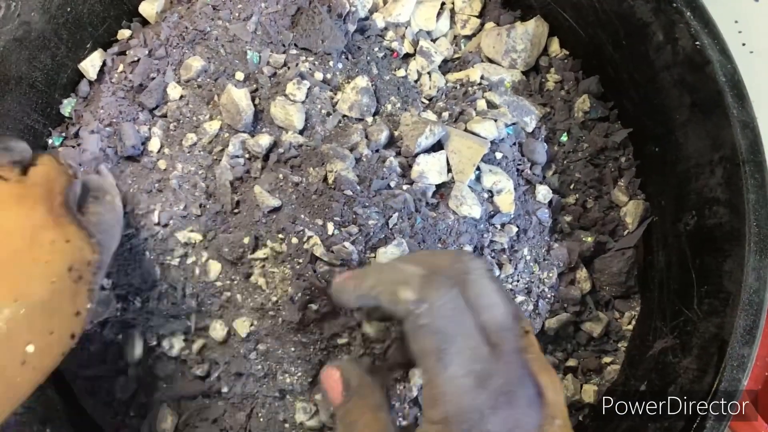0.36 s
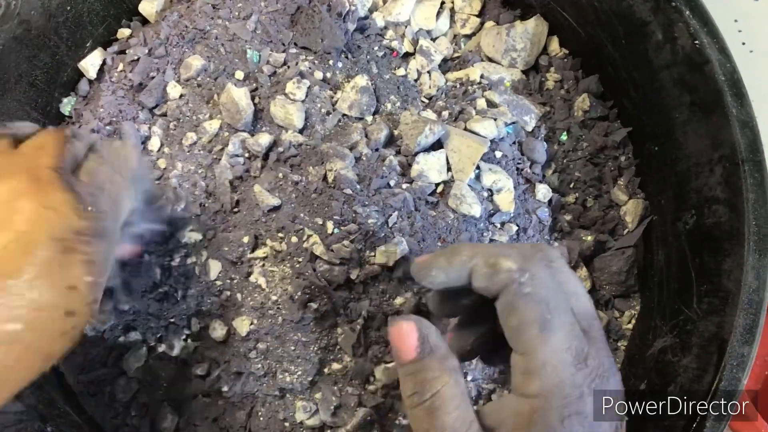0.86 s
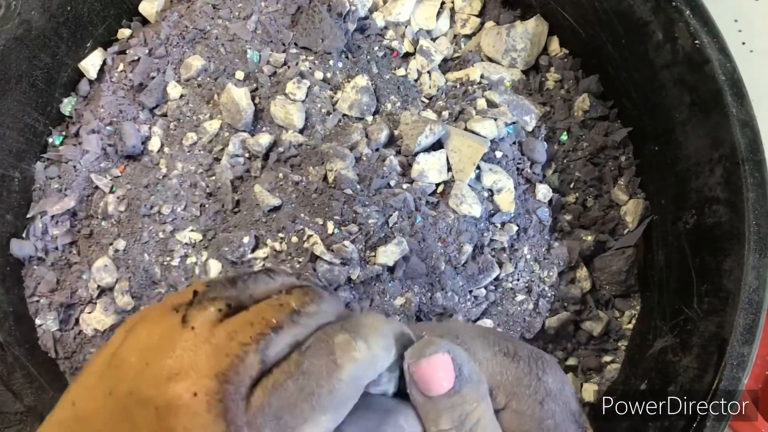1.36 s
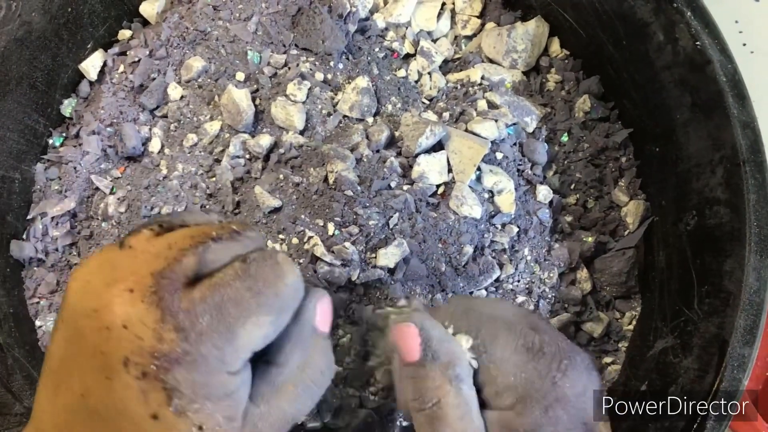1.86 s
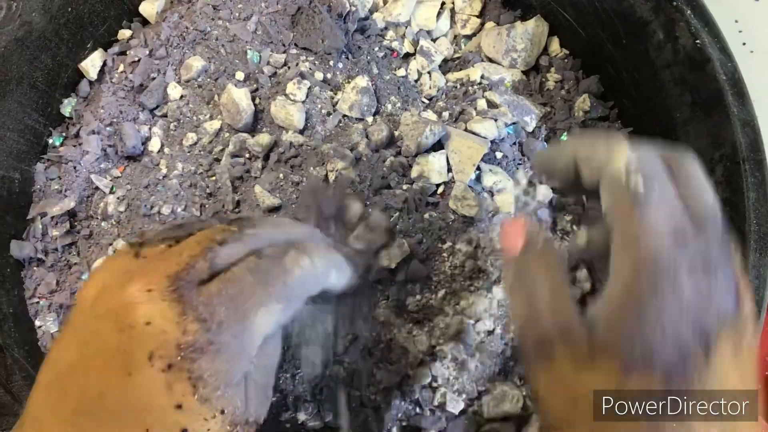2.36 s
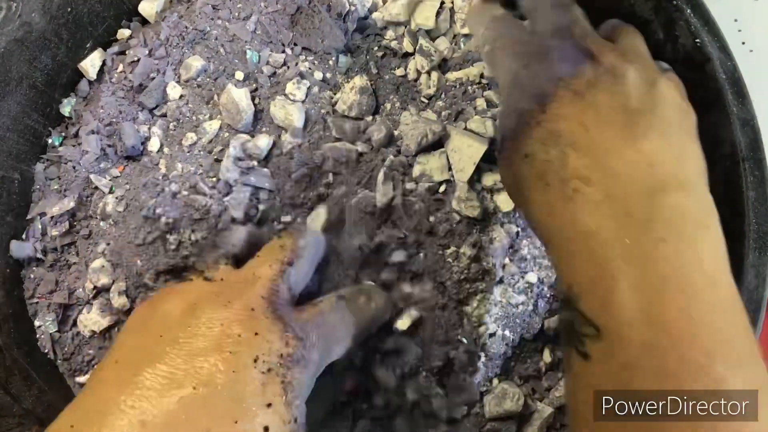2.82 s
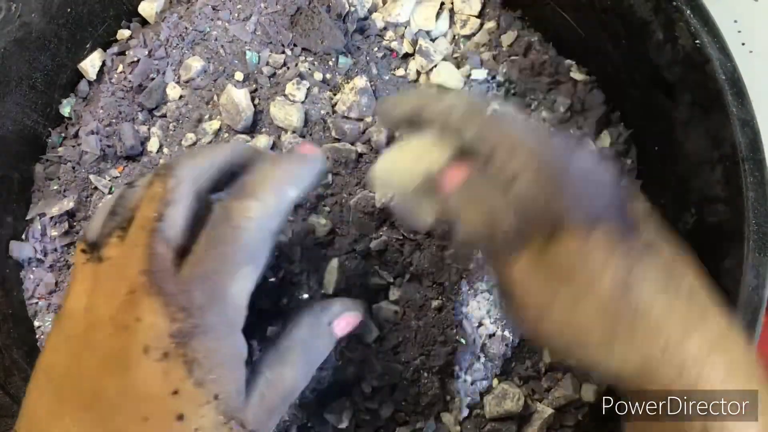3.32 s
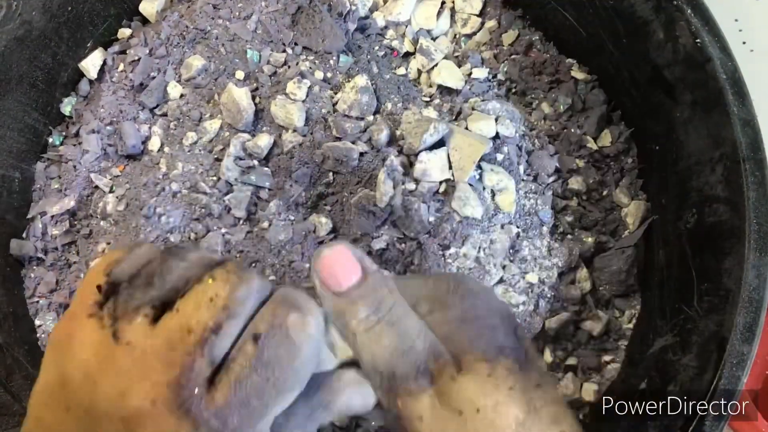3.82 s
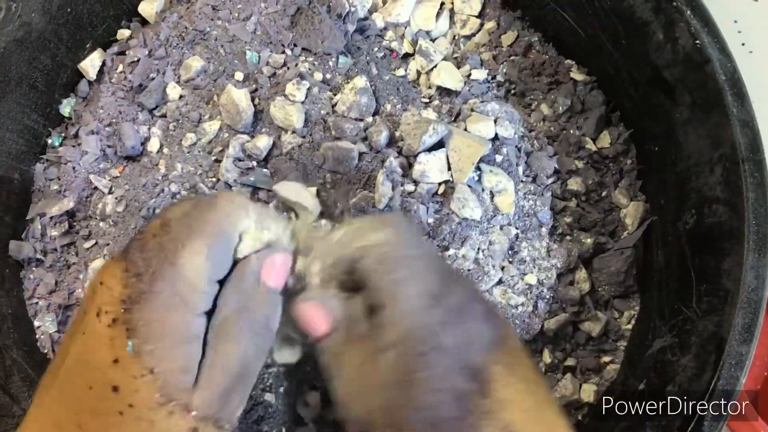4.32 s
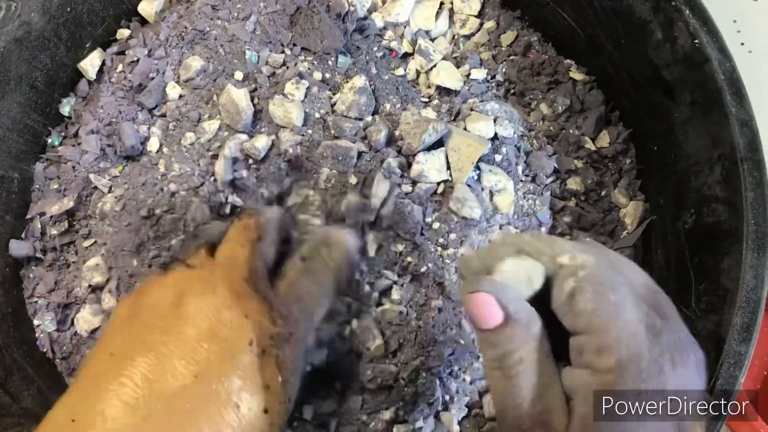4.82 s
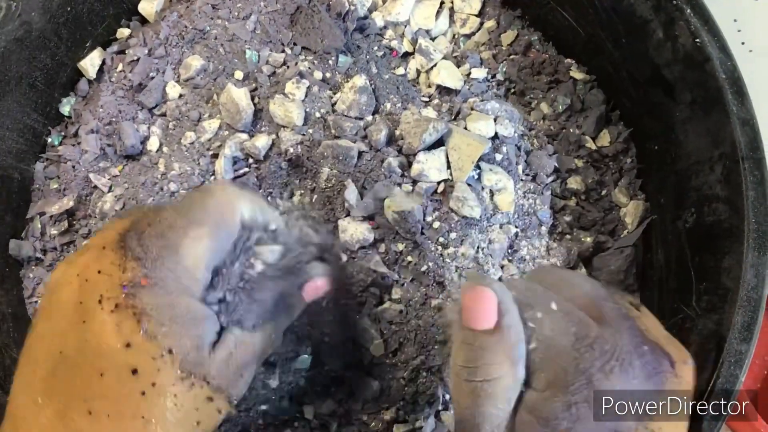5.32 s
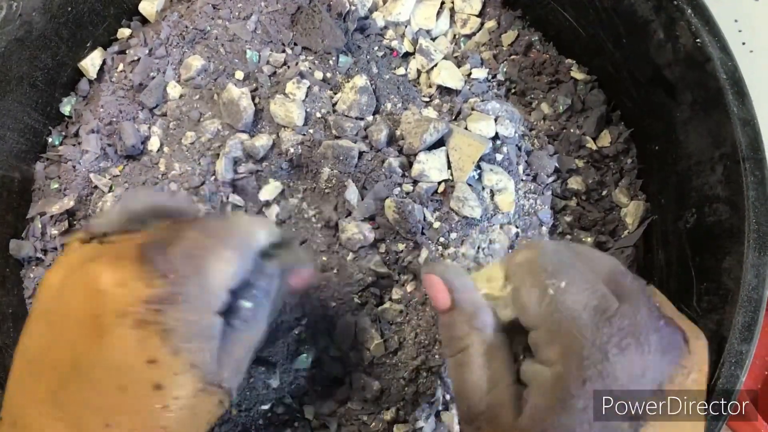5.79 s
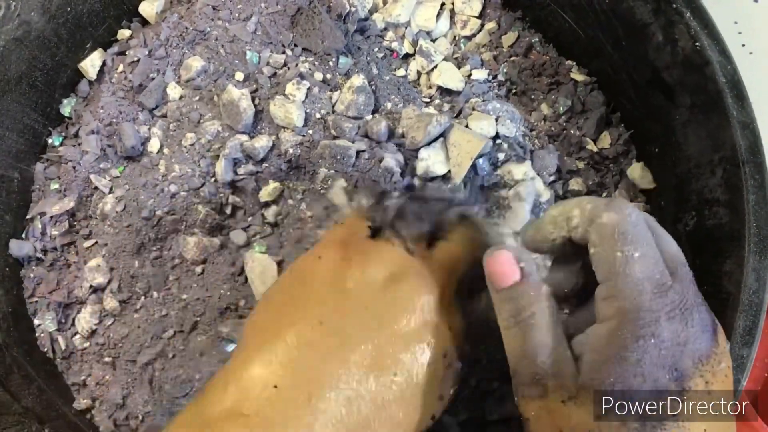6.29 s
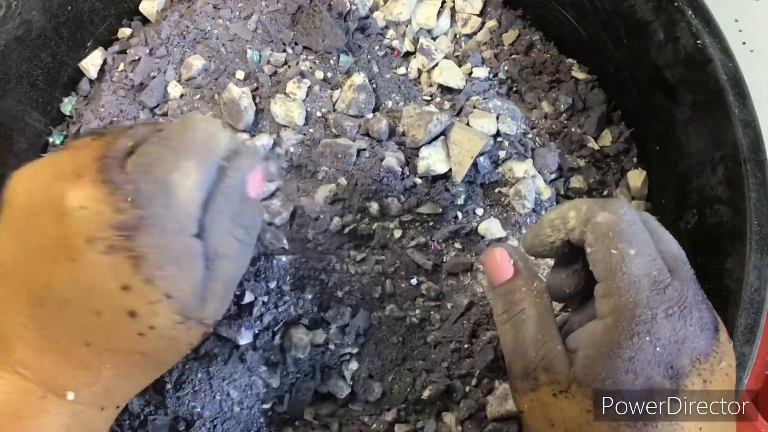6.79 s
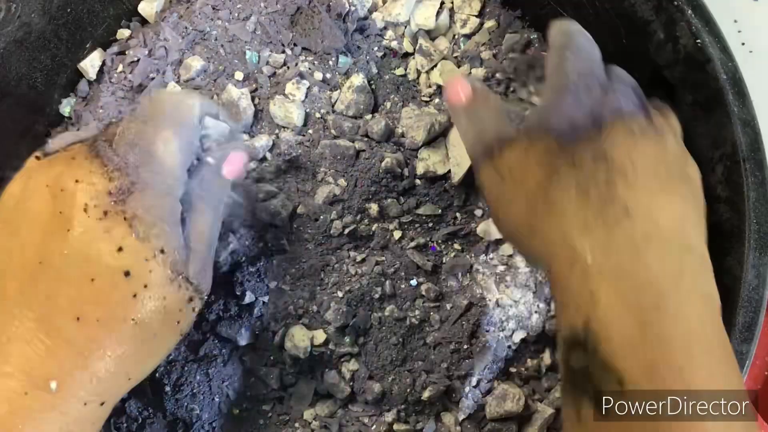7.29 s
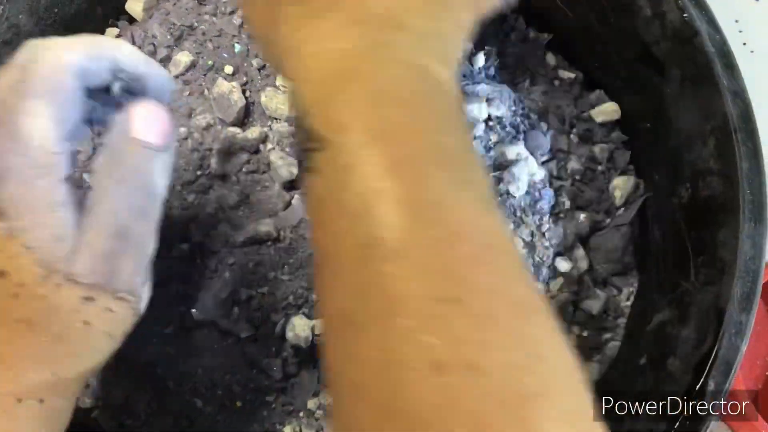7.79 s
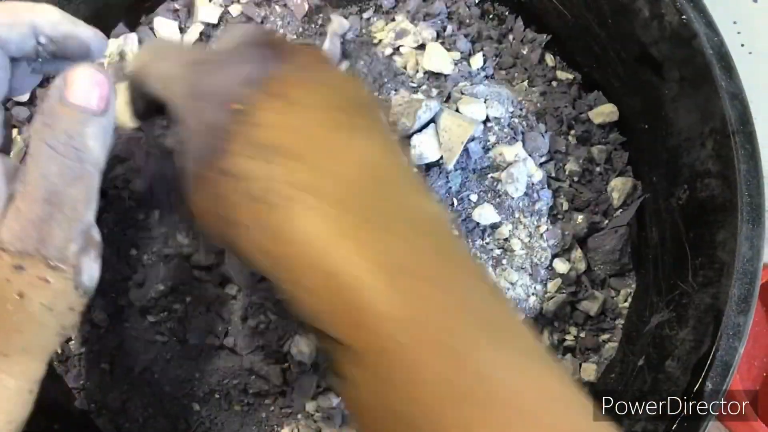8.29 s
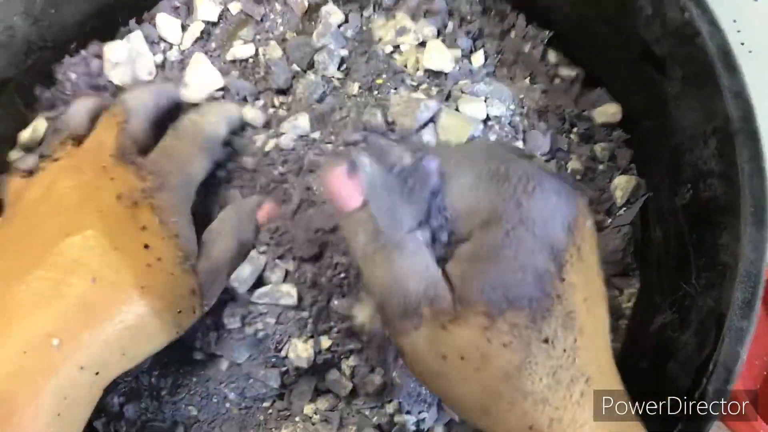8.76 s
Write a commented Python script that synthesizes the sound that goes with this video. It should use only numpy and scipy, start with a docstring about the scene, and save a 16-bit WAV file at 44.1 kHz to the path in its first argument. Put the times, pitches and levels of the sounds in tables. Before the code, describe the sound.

Fingers crumble dry chalk lumps to powder in a wide plastic tub, sandy crackle, sharp snaps, soft low booms, ending in heavy scooping and a loud thud.

```python
"""Fingers rub chalk to powder with a dry, sandy crackle, close under a phone microphone; a wide plastic
tub booms when its floor is pushed or knocked. Tiny fractures ringing grains over hiss make the crackle,
short bursts of tearing noise ring the snapping lumps, and tuned resonances make the tub.
Dragged lumps knock its wall, grit rattles in the hollow of a scooping hand, a quiet room hums below,
and the loudest blows overload the input."""
import sys
import numpy as np
from scipy import signal
from scipy.fft import rfft, irfft
from scipy.io import wavfile

SR = 44100
rng = np.random.default_rng(int(sys.argv[2]) if len(sys.argv) > 2 else 0)


def ratio_of_db(decibels):
    """Turn decibels (scalar or array-like) into linear amplitude factors; 0 dB maps to 1."""
    return 10 ** (np.asarray(decibels, float) / 20)


def transcribe(u):
    """Save the signal u as a 16-bit wav file named by the first command-line argument.

    u: samples, shape (n,) or (channels, n), limited to [-1, 1]; the rate is SR.
    q: integer samples, one column per channel.
    """
    v = np.clip(np.atleast_2d(u).T, -1, 1)
    q = np.round(v * 32767).astype(np.int16)
    wavfile.write(sys.argv[1], SR, q)


N = 403074


def rms_one(x):
    """Scale to rms 1."""
    return x / np.sqrt(np.mean(x ** 2) + 1e-20)


def band(x, low_hz, high_hz):
    """Second-order band-pass."""
    edges_hz = [low_hz, min(high_hz, SR / 2.2)]
    return signal.sosfilt(signal.butter(2, edges_hz, "band", fs=SR, output="sos"), x)


def drift(rate_hz):
    """Slow chance: noise at every 20th sample through a double one-pole low-pass; spread 1."""
    pole = np.exp(-2 * np.pi * rate_hz * 20 / SR)
    noise = rng.standard_normal(N // 20 + 2002)
    slow = signal.lfilter([1], [1, -2 * pole, pole * pole], noise)[2000:]   # drop the filter's start-up
    return np.interp(np.arange(N) / 20, np.arange(len(slow)), rms_one(slow))


def ring(force, hz, t60):
    """A resonance: a unit click sets a sine of about height 1 ringing, down 60 dB after t60 seconds."""
    r, w = ratio_of_db(-60 / (t60 * SR)), 2 * np.pi * hz / SR
    return signal.lfilter([0, np.sin(w)], [1, -2 * r * np.cos(w), r * r], force + 1e-18)


def strokes(rows, levels_db, sag_db_per_s):
    """Summed power of strokes that rise, sag while held and die away on release; one value per 64 samples."""
    release_s, release_share = 0.015, 0.15   # decay time: a fixed part plus a share of the stroke's length
    start, rise, length = np.array(rows)[:, :3].T[:, :, None]
    age = np.arange(N // 64 + 1) * 64 / SR - start
    swell = np.clip(age / np.maximum(rise, 1e-3), 0, 1)
    sag = ratio_of_db(-sag_db_per_s * np.clip(age, 0, length))
    fading = np.exp(-np.maximum(age - length, 0) / (release_s + release_share * length))
    return np.sum((ratio_of_db(levels_db)[:, None] * swell * sag * fading) ** 2, axis=0)


def as_db(power, resting_db):
    """Stroke power added to a resting level, in dB at every sample."""
    level_db = 10 * np.log10(power + ratio_of_db(2 * resting_db))
    return np.interp(np.arange(N) / 64, np.arange(len(power)), level_db)


def hands():
    """Levels of the four grain sizes, the tub boom and the dragging, driven by digging, rubbing and pressing."""
    # Fingers rubbing chalk to powder. Each row: start, rise and length in seconds, sand level in dB, # fineness
    # in dB (powder up, lumps down).
    rubs = [(0.0, 0.0036, 0.1, -42, 1.8), (0.118, 0.077, .11, -43, 2), (0.344, 0.0091, .4, -52, -2.5),
            (0.389, .03, 0.056, -48, 4), (0.564, 0.014, 0.036, -49, -0.5), (.8, .02, .05, -54, -1),
            (0.869, .02, 0.28, -60.5, -5), (1.129, 0.036, .2, -55.5, 3.3), (1.39, 0.0044, .04, -51, -1),
            (1.439, .02, .22, -54, 1.5), (1.66, .05, .3, -50, 1.8), (1.97, .1, .24, -51.5, 2.2),
            (2.298, 0.025, 0.046, -43, 8), (2.41, 0.018, .1, -51.5, -4.5), (2.541, .05, 0.092, -56.5, 11),
            (2.621, 0.053, .28, -44.5, -2), (2.902, .06, .17, -39, -4.5), (3.088, 0.032, .28, -51.5, 2.5),
            (3.4, .05, .15, -60, 8), (3.619, 0.12, .27, -54, -2), (3.893, .003, .07, -38, 0),
            (3.999, 0.0038, .13, -38, -2.5), (4.171, 0.024, 0.22, -46, 1.5), (4.279, 0.014, .05, -45, -2.5),
            (4.441, 0.031, .16, -54.5, 8.5), (4.62, .02, .06, -46, 2), (4.699, 0.053, 0.17, -45.5, -2.5),
            (4.9, .03, 0.13, -50, -2.5), (5.051, .03, 0.29, -45, 2), (5.298, 0.073, 0.093, -39, 1),
            (5.43, .04, .1, -41.5, 2.5), (5.54, 0.018, 0.15, -42.5, 0.5), (5.698, .08, .21, -45, 3.5),
            (5.949, 0.011, 0.044, -47.5, 7.5), (6.0, .03, .17, -50, 0), (6.17, .08, 0.39, -46.5, -6),
            (6.55, .03, .13, -46, 3.7), (6.7, .03, .12, -47, 1.1), (6.868, 0.018, .06, -39, 1.2),
            (6.95, .05, .18, -48, 2.5), (7.179, .015, .1, -41.5, -8.5), (7.279, .05, .11, -36.5, -8.5),
            (7.39, .02, .15, -42.5, -10.5), (7.541, .05, 0.22, -41.5, -11), (7.72, .09, .16, -33.5, -15),
            (7.87, 0.087, .3, -29.5, -10.5), (8.201, .15, 0.46, -39, 1.7), (8.58, .1, .22, -33, 3.5),
            (8.82, .02, 0.35, -36, -1.4)]
    # Hand pressing on the tub floor. Each row: start, rise and length in seconds, boom level in dB.
    presses = [(0.076, .04, .08, -42), (0.353, 0.036, 0.27, -34.5), (0.597, .07, 0.18, -34.5),
               (.84, .03, .08, -44), (1.27, 0.093, .12, -35.5), (1.528, 0.13, .12, -35),
               (1.853, 0.083, 0.13, -47.5), (2.195, 0.037, 0.074, -37), (2.305, 0.038, 0.11, -33),
               (2.56, .04, 0.041, -47), (2.65, 0.055, 0.25, -36.5), (2.884, 0.064, 0.14, -26),
               (3.074, 0.018, .15, -39.5), (3.823, 0.046, 0.12, -28.5), (3.99, 0.035, 0.14, -30),
               (4.145, 0.034, .25, -40), (4.606, 0.28, .27, -26), (5.297, 0.04, .25, -45.5),
               (5.913, 0.0082, 0.19, -34), (6.124, 0.14, 0.34, -34.5), (6.906, 0.09, 0.12, -40.5),
               (7.178, 0.015, 0.21, -24), (7.435, 0.17, 0.45, -29.5), (7.78, .01, 0.13, -19.5),
               (7.876, 0.031, .27, -18.5), (8.205, .05, 0.1, -31), (8.598, 0.073, .1, -32.5),
               (8.707, .04, .1, -33.5), (8.829, 0.033, .13, -19.5), (9.0, 0.027, .14, -38)]
    # Hand digging through the lumps. Each row: start, rise and length in seconds, lumps level in dB,
    # level of dragging on the wall in dB.
    digs = [(0.336, 0.0056, 0.11, -42, -49.5), (0.482, 0.024, 0.054, -47, -46),
            (0.548, 0.045, 0.15, -41, -42), (0.754, 0.026, .08, -47.5, -68.5),
            (0.893, 0.05, 0.38, -64, -54.5), (1.293, 0.089, 0.11, -58.5, -50.5),
            (1.553, 0.027, 0.063, -58, -50), (1.803, 0.17, .36, -53.5, -57),
            (2.321, 0.037, .18, -53, -50.5), (2.6, 0.079, 0.15, -45.5, -40.5),
            (2.758, 0.045, .12, -41.5, -36.5), (2.873, 0.099, 0.15, -39.5, -39),
            (3.082, 0.026, .22, -46.5, -52.5), (3.562, 0.23, .28, -48, -54), (3.841, 0.0059, .11, -40, -46),
            (4.093, 0.087, .3, -48, -50.5), (4.649, 0.11, .24, -40.5, -35.5),
            (4.912, 0.038, 0.49, -46, -50), (5.347, .01, 0.033, -41, -50), (5.444, .05, 0.41, -56.5, -52.5),
            (6.099, .2, .36, -39.5, -42), (6.525, 0.059, 0.38, -48.5, -47.5),
            (7.171, 0.026, 0.12, -36.5, -41.5), (7.276, 0.083, .09, -39, -32),
            (7.4, 0.16, 0.42, -40, -39.5), (7.762, 0.0057, 0.053, -31, -33), (7.848, .09, .3, -27.5, -30),
            (8.175, 0.039, .2, -44, -41), (8.417, .03, .17, -48.5, -54), (8.596, 0.067, .2, -36.5, -39),
            (8.823, 0.035, 0.27, -38, -37.5)]
    # What digging sends to lumps, grit, sand and powder, in dB.
    from_digging = (-0.4, -4.5, -11.5, -10)
    # What rubbing sends to lumps, grit, sand and powder, in dB.
    from_rubbing = (-14, -3, 0.3, -0.7)
    # The heap settling between strokes: lumps, grit, sand and powder, in dB.
    settling = (-62, -68.5, -63.5, -66)
    # How far fineness moves lumps, grit, sand and powder, in dB per dB.
    fineness_share = (-0.93, -0.028, 0.01, 1)
    dig_sag, push_sag, rub_sag = 6.5, 24, 7.5   # dB per s
    lumps_db, drag_db = np.array(digs)[:, 3:].T
    sand_db, fine_db = np.array(rubs)[:, 3:].T
    dig = strokes(digs, lumps_db, dig_sag)
    grains = []
    for dug_db, rubbed_db, rest_db, share in zip(from_digging, from_rubbing, settling, fineness_share):
        rub = strokes(rubs, sand_db + rubbed_db + share * fine_db, rub_sag)
        grains.append(as_db(ratio_of_db(2 * dug_db) * dig + rub, rest_db))
    boom = as_db(strokes(presses, np.array(presses)[:, 3], push_sag), -53)
    drag = as_db(strokes(digs, drag_db, dig_sag), -56.5)
    return grains, boom, drag


def crackle(levels_db, per_s=700., clump_db=5.0, spread_db=3.0, surge_db=1.0):
    """One clumped train of tiny fractures rings a random grain of every size, over rubbing hiss."""
    # Grain families, lumps to powder. Each row: low and high pitch in Hz, cycles of ring down to -60 dB,
    # smooth (hiss) share of the power 0-1.
    grain_families = [(543, 2020, 30, 0.81), (2050, 4120, 20, 0.94), (4500, 8420, 30, 0.82),
                      (8800, 23000, 0.9, 0.59)]
    clumping = ratio_of_db(clump_db * (drift(60.) + .7 * drift(20.)))
    born = rng.random(N) < per_s * clumping / SR
    strength = ratio_of_db(spread_db * np.minimum(rng.exponential(1, N), 5))
    clicks = born * strength * rng.choice([-1, 1], N)
    surge = ratio_of_db(surge_db * drift(23.4))     # the whole handful slips at once
    out = 0
    for (low_hz, high_hz, cycles, smooth), level_db in zip(grain_families, levels_db):
        dealt = rng.integers(0, 8, N)       # which of eight pitches each fracture rings
        pitches = np.geomspace(low_hz, high_hz, num=8)
        rings = sum(ring(clicks * (dealt == k), hz, cycles / hz) for k, hz in enumerate(pitches))
        hiss = band(rng.standard_normal(N), low_hz, high_hz) * ratio_of_db(2.2 * drift(30.))
        mix = np.sqrt(1 - smooth) * rms_one(rings) + np.sqrt(smooth) * rms_one(hiss)
        out = out + ratio_of_db(level_db) * surge * mix
    return out


def room():
    """Shaped steady noise, a faint appliance hum, and a slow subsonic sway at the microphone."""
    # Colour of the room noise. Each row: frequency in Hz, relative level in dB per Hz.
    room_colour = np.array([(12, -36), (20, -3), (123, 8), (187, -17), (347, 9), (660, -93), (718, -41),
                            (897, -23), (4670, -44), (12800, -37), (16000, -37)])
    hz = np.fft.rfftfreq(N, 1 / SR) + 1     # the 1 keeps the logarithm finite
    colour = ratio_of_db(np.interp(np.log(hz), np.log(room_colour[:, 0]), room_colour[:, 1]))
    air = irfft(rfft(rng.standard_normal(N)) * colour, N)
    sway_hz = 19.3
    sway = band(rng.standard_normal(N), sway_hz / 1.5, sway_hz * 1.5) * ratio_of_db(3. * drift(4.))
    hum = np.sin(2 * np.pi * 123 * np.arange(N) / SR)
    return ratio_of_db(-51.5) * hum + ratio_of_db(-54.5) * rms_one(air) + ratio_of_db(-40) * rms_one(sway)


def tub(boom_db, lumpy_db=-0.5, tap_ms=1.1, top_hz=129.0):
    """The tub's floor rings under lumpy hand pressure and under padded knocks that start with a tap."""
    # Knocks. Each row: start in seconds, strength in dB, upper modes in dB over strength, tap in dB,
    # spot from -1 rim to 1 middle.
    knocks = [(0.342, -23, 1, -41, -0.43), (0.662, -25, 0, -45, 0.15), (2.208, -26.5, 2.5, -24.5, -.7),
              (2.847, -20, -8, -25, .52), (5.907, -19, 1, -24.5, -0.66), (7.294, -16, -3, -42, .42),
              (7.773, -17, 10, -19, 0.096), (7.923, -20.5, 14.5, -35, -0.008),
              (8.111, -11, 8.5, -34, -0.12), (8.28, -33, 14, -19.5, 0.38), (8.815, 11, -0.1, -0.5, 0.99)]
    # Floor modes. Each row: frequency in Hz, level in dB, 60 dB decay in seconds when knocked.
    floor_modes = [(69.3, 0, 0.21), (100.9, 2.5, 0.13), (124, 0.5, 0.21), (207.5, -19.5, 0.069),
                   (257.6, -16, 0.17), (316, -32, 0.11)]
    contact_ms, shortens = 2.43, 0.32   # contact at 0 dB; harder knocks are briefer, dB per dB
    blows, taps = np.zeros((len(floor_modes), N)), np.zeros(N)
    tap = np.hanning(round(tap_ms * SR / 1000) + 2)
    for s, peak_db, upper_db, tap_db, spot in knocks:
        at = round(s * SR)
        length = contact_ms * ratio_of_db(-shortens * peak_db) * SR / 1000
        # a padded hand is a slow push
        push = np.sin(np.pi * np.arange(int(length)) / length) * np.pi / 2 / length
        reach = np.full(len(floor_modes), ratio_of_db(peak_db + upper_db))
        reach[0] = ratio_of_db(peak_db)
        reach[1] *= spot          # the second mode has a node line: its sign follows the spot struck
        blows[:, at:at + len(push)] += reach[:, None] * push
        taps[at:at + len(tap)] += ratio_of_db(tap_db) * tap
    knocked = sum(ratio_of_db(db) * ring(blow, hz, t60) for blow, (hz, db, t60) in zip(blows, floor_modes))
    pressure = band(rng.standard_normal(N), 41.0, top_hz) * ratio_of_db(lumpy_db * drift(33.0))
    # the pressing hand damps the modes
    pushed = sum(ratio_of_db(db) * ring(pressure, hz, 0.64 * t60) for hz, db, t60 in floor_modes)
    return taps + knocked + ratio_of_db(boom_db) * rms_one(pushed)


def snaps(breaks, crack_quicker=0.39, thin_hz=450., crack_hz=3950.0, crack_top_hz=12400.0, cycles=7.2,
          under_db=-10.5, over=1.73, over_db=-9.5, tail_db=-9.5, tail_s=0.0039):
    """A brief tear rings the lump (big breaks more of its low mode), cracks brightly and leaves falling crumbs."""
    size = 5000   # samples given to each snap
    out, t = np.zeros(N + size), np.arange(size) / SR
    noise = rng.standard_normal((len(breaks), 3, size))
    for (s, ring_db, hz, crack_db, tear_ms), (push, spit, crumbs) in zip(breaks, noise):
        age = t * 1000 / max(tear_ms, .1)
        tear = np.exp(-age) * (1 - np.exp(-14. * age))
        body = ring(push * tear, hz, cycles / hz)
        body += ratio_of_db(over_db) * ring(spit * tear, over * hz, cycles / hz)
        body += ratio_of_db(under_db + .4 * ring_db) * ring(crumbs * tear, max(.45 * hz, 600), 12 / hz)
        crack = band(spit * tear * np.exp(-crack_quicker * age), crack_hz, crack_top_hz)
        snap = ratio_of_db(ring_db) * body / np.abs(body).max() + ratio_of_db(crack_db) * crack / np.abs(crack).max()
        gritty = crumbs * np.abs(push) * np.abs(spit)     # crumbs land unevenly
        tail = ratio_of_db(min(ring_db, 0) + tail_db) * band(gritty, .5 * hz, 8200) * np.exp(-t / tail_s)
        out[round(s * SR):][:size] += snap + tail
    # the snaps are thinned below the high-pass, big ones included
    return signal.sosfilt(signal.butter(2, thin_hz, "high", fs=SR, output="sos"), out[:N])


def crumbs_breaking(grains_db, count=70, busier=.25, ring_over_db=12.5, crack_over_db=20.0,
                    spread_db=3.5, tear_ms=0.63):
    """Small snaps fall at random, more often in busy moments, levels following the grit and powder."""
    place, pitch, *chance = rng.random((count, 5)).T
    busy = np.cumsum(ratio_of_db(busier * grains_db[3]))
    at = np.searchsorted(busy, place * busy[-1]).clip(0, N - 1)
    ring_db = grains_db[1][at] + ring_over_db - spread_db * np.log(chance[0] + 0.13)
    crack_db = grains_db[3][at] + crack_over_db - spread_db * np.log(chance[1] + 0.058)
    hz = 700 * 7 ** np.sqrt(pitch)
    tearing_ms = tear_ms * 3 ** (2 * chance[2] - 1)
    return list(zip(at / SR, ring_db, hz, crack_db, tearing_ms))


def dragging(level_db, per_s=400.):
    """Lumps dragged over the plastic knock the wall resonances densely."""
    # Tub wall resonances. Each row: frequency in Hz, level in dB, 60 dB decay in seconds.
    wall_modes = [(211, -8.5, 0.068), (242, -4, 0.041), (334, 8, 0.02), (444, 5.5, 0.019),
                  (491.4, -4, 0.04), (582, -27, 0.25), (722, -9.5, 0.25)]
    bumps = (rng.random(N) < per_s / SR) * rng.standard_normal(N) * ratio_of_db(2.4 * drift(17.0))
    wall = sum(ratio_of_db(db) * ring(bumps, hz, t60) for hz, db, t60 in wall_modes)
    return ratio_of_db(level_db) * rms_one(wall)


def scoops(per_s=290.0, clump_db=8.0, spread_db=1.0, width_hz=360.0):
    """Coarse grit rattles in the hollow of the hand, whose air resonance moves as it closes."""
    # The hollow under the hand, one list per scoop. Each row: time in seconds, resonance in Hz, level in dB.
    hollows = [
        [(2.8, 1500, -56), (2.834, 1480, -39), (2.932, 1550, -31.5), (3.028, 1730, -62), (3.1, 1630, -32.5)],
        [(7.82, 2050, -31), (7.9, 2570, -30), (7.978, 2530, -24.5), (8.052, 2560, -27.5), (8.108, 2380, -24),
         (8.17, 1690, -49)],
    ]
    t, out = np.arange(N) / SR, np.zeros(N)
    born = rng.random(N) < per_s * ratio_of_db(clump_db * drift(30.)) / SR
    strength = ratio_of_db(spread_db * np.minimum(rng.exponential(1, N), 5))
    rattle = born * strength * rng.choice([-1, 1], N)
    r = np.exp(-np.pi * width_hz / SR)
    for rows in hollows:
        s, hz, level_db = np.transpose(rows)
        now = (t >= s[0]) & (t < s[-1])
        turn = np.exp(2j * np.pi * np.cumsum(np.interp(t[now], s, hz)) / SR)
        # a resonance that follows hz: shift down, smooth, shift back up
        rung = (signal.lfilter([1], [1, -r], rattle[now] / turn) * turn).imag
        fade = np.hanning(now.sum()) ** 0.17
        out[now] += ratio_of_db(np.interp(t[now], s, level_db)) * fade * rms_one(rung)
    return out


def scene():
    """All sources, one channel."""
    # Big lumps snapping. Each row: start in seconds, ring level in dB, ring pitch in Hz, crack level in dB,
    # tearing time in ms.
    big_breaks = [(.079, -26, 2470, -25, 4.9), (.1784, -27.5, 4850, -11.5, 0.44),
                  (.22, -44.5, 4820, -15, 2.4), (.2816, -23.5, 4500, -18.5, 0.57),
                  (.3418, -28, 690, -39.5, 0.81), (.355, -24, 1330, -38, 1.8),
                  (.3754, -29, 1460, -23.5, 1.1), (.405, -25.5, 1360, -28, 2),
                  (.424, -19.5, 1450, -30, 5.7), (.43, -18.5, 1364, -35, 0.86), (.51, -27, 670, -45, 3.8),
                  (.524, -28, 1770, -47, 1.8), (.66, -22, 1490, -40, 4.2), (.7847, -23, 1060, -51, 4.5),
                  (.9535, -34.5, 4560, -34, 0.88), (1.3899, -49, 3880, -19, 2.3),
                  (1.449, -23, 3920, -20, 2.2), (1.471, -17, 4130, -6.5, .79),
                  (1.4948, -15, 1670, -10, 1.9), (1.5618, -25, 3800, -25, 0.3),
                  (1.5812, -35.5, 750, -17, 0.17), (1.668, -37, 3320, -21, 1.7),
                  (1.6963, -43, 3170, -13.5, 0.73), (1.7204, -40, 5000, -22, 0.9),
                  (1.7377, -11.5, 3800, -8, 0.72), (1.7617, -22, 1250, -15.5, 1.7),
                  (1.785, -46, 4330, -22, .55), (1.8225, -27.5, 2740, -22.5, 0.91),
                  (2.323, -36, 4440, -29, 8.6), (2.343, -16, 4770, -16.5, 3.5),
                  (2.4351, -20, 1350, -21, 2.1), (2.46, -20.5, 1730, -40, 1.4), (2.4645, -25, 2470, -40, 4),
                  (2.7555, -28, 704, -10, 0.71), (2.8033, -39, 860, -15, 0.33),
                  (2.8477, -24, 1640, -41, 2.6), (2.8777, -18, 1530, -38, 1.3),
                  (2.9061, -11, 1370, -36, 0.63), (2.9293, -19, 2110, -25, .6),
                  (2.984, -19.5, 1170, -18, 1.2), (3.0069, -12, 3750, -19, 0.91),
                  (3.059, -22, 1520, -39, 1.2), (3.1431, -24, 830, -42, 3.1),
                  (3.359, -17, 4150, -15.5, 0.45), (3.6783, -25, 3080, -22, 1.5),
                  (3.8359, 0.7, 2950, -21, 1.4), (3.8595, 5.5, 2870, 7, 1.56), (3.8653, 2.5, 5000, 3, 0.97),
                  (3.8924, 4.5, 3230, 5, 0.72), (3.9124, -24, 3380, -12, 1.7), (3.9168, -16, 3550, -16, .9),
                  (3.9367, -12, 4780, -8, 0.18), (3.9489, -25, 4540, -9, .46),
                  (3.9532, -11, 3750, -11, 1.9), (4.0006, 1.5, 2500, -10, 1.36),
                  (4.0716, -11, 3080, 2, 0.58), (4.1748, -17, 2800, -33, 0.81),
                  (4.1804, -19.5, 3000, -34, 1.1), (4.2791, -15, 4200, -27, 2.2),
                  (4.3509, -29, 1770, -21, 0.54), (4.4511, -50, 2630, -27, 0.5),
                  (4.644, -26, 3270, -16, 0.56), (5.065, -35, 5100, -16, .79),
                  (5.2665, -11, 3330, -7.5, 0.5), (5.2707, -5.5, 3100, -4.5, 0.36),
                  (5.5486, -28, 3470, -15, 0.27), (5.5576, -34, 3620, -13.5, 1.3),
                  (5.5961, -43, 4480, -16.5, 0.79), (5.667, -34, 4950, -14.5, 0.51),
                  (5.711, -26, 4740, -15.5, 1.5), (5.7313, -9, 4300, -6, 0.47),
                  (5.8405, -14.5, 3330, -3, 1.9), (5.8782, -34, 4760, -12, 0.53),
                  (5.8905, -29, 4400, -13.5, 2.5), (6.2831, -14.5, 1250, -43, 1.8),
                  (6.7724, -41, 4600, -13, 1.2), (6.8469, -21, 3700, -34, 1),
                  (7.1719, -26, 5000, -21, 0.78), (7.1944, -17.5, 970, -25, 2.3),
                  (7.301, -19, 1430, -19, 3.5), (7.5448, -17.5, 1530, -37, 3.1),
                  (7.6832, -13, 3200, -29, .45), (7.8723, -11, 3300, -33, .6), (7.9327, -5, 2480, -31, .8),
                  (7.9488, -6, 2530, -31, 0.4), (8.0056, -12, 2470, -37, 3.2),
                  (8.0627, -7.5, 3100, -32, 3.8), (8.079, -9, 2550, -30, 2.7),
                  (8.2572, -17, 1970, -14, 1.2), (8.275, -25.5, 1020, -29, 5.7),
                  (8.586, -22.5, 2150, -11.5, 0.39), (8.6493, -13.5, 2650, 0, 0.95),
                  (8.653, -11, 2720, 3, 0.44), (8.668, -33.5, 1216, -13, 1.3),
                  (8.8178, -5.5, 1523, -22.5, 0.9), (8.8256, -9.5, 1550, -11, 0.61),
                  (8.8923, -28.5, 4160, -32, 0.6), (8.981, -21.5, 690, -38, 1.14),
                  (9.061, -16.5, 710, -18.5, 1.5)]
    grains, boom, drag = hands()
    breaks = big_breaks + crumbs_breaking(grains)
    handled = crackle(grains) + snaps(breaks) + scoops()
    return (handled + tub(boom) + dragging(drag) + room())[None]


def roll_off(x):
    """The treble ends steeply here."""
    return signal.sosfilt(signal.butter(12, 16300, fs=SR, output="sos"), x)


def record(dry):
    """The microphone's top is cut, then its input clips hard."""
    cut = signal.cheby2(10, 32, 16300, fs=SR, output="sos")
    clipped = np.clip(signal.sosfilt(cut, dry), -1, 1)
    return roll_off(clipped)


dry = scene()
out = record(dry)
transcribe(out)
```